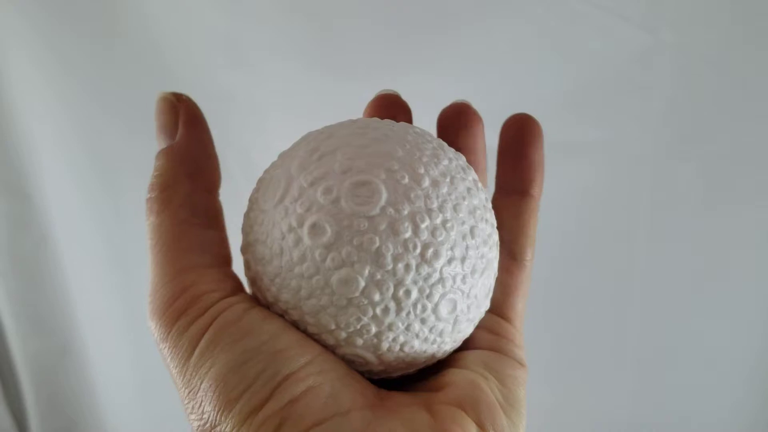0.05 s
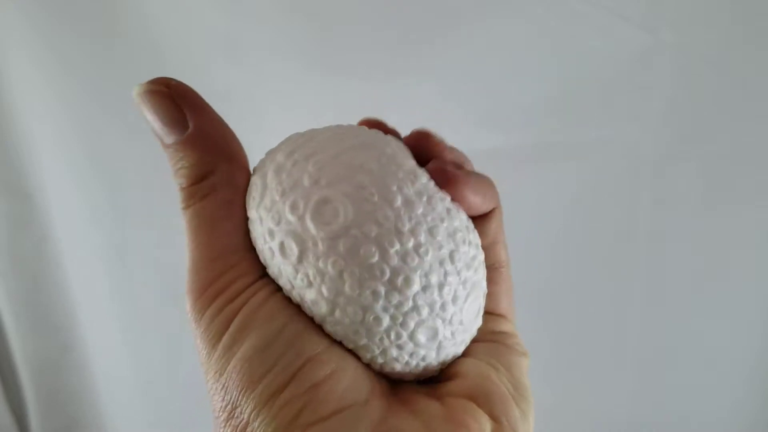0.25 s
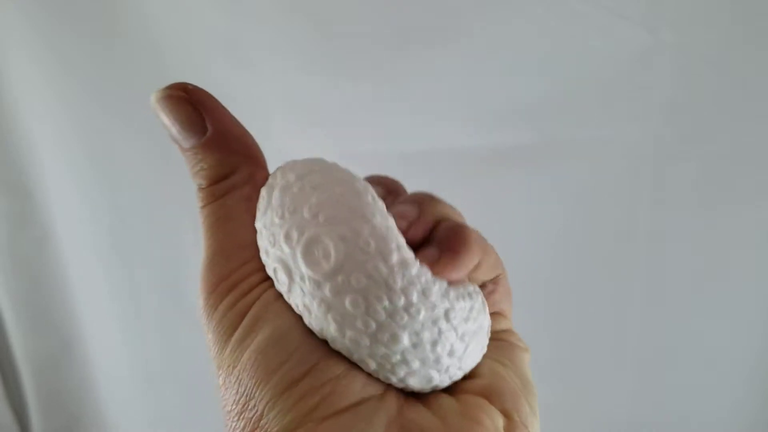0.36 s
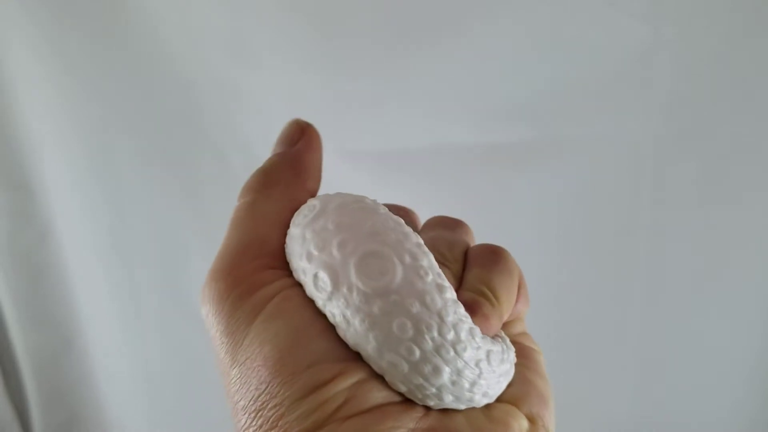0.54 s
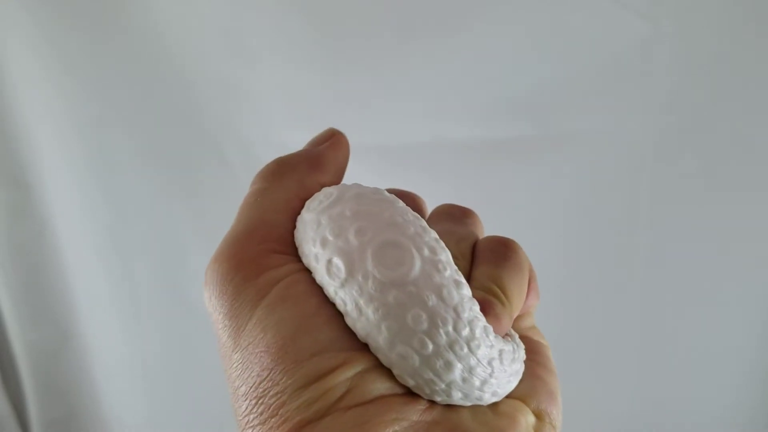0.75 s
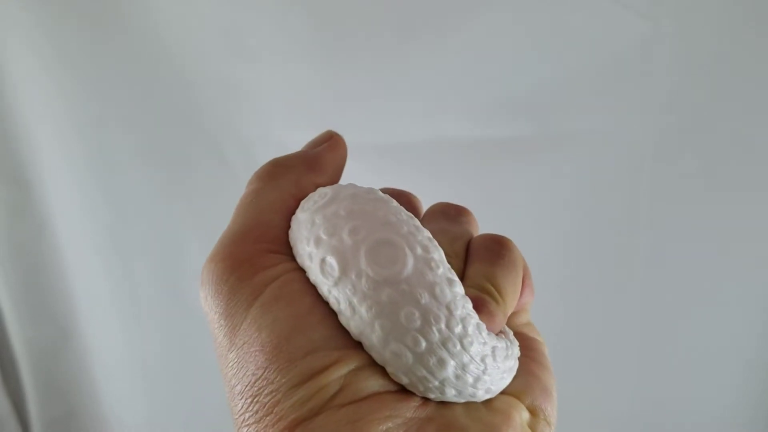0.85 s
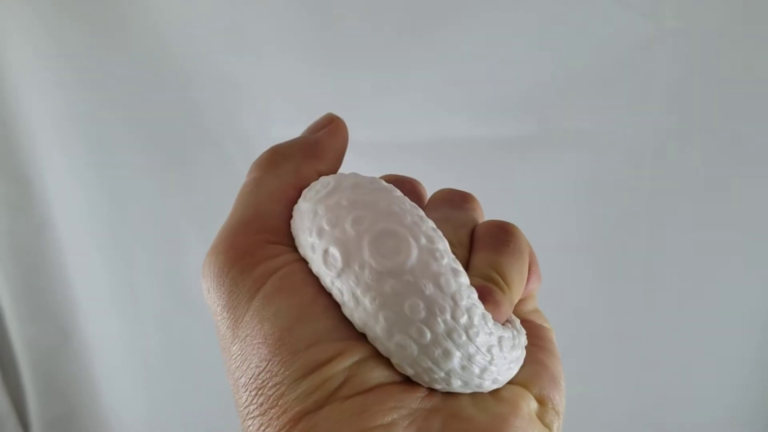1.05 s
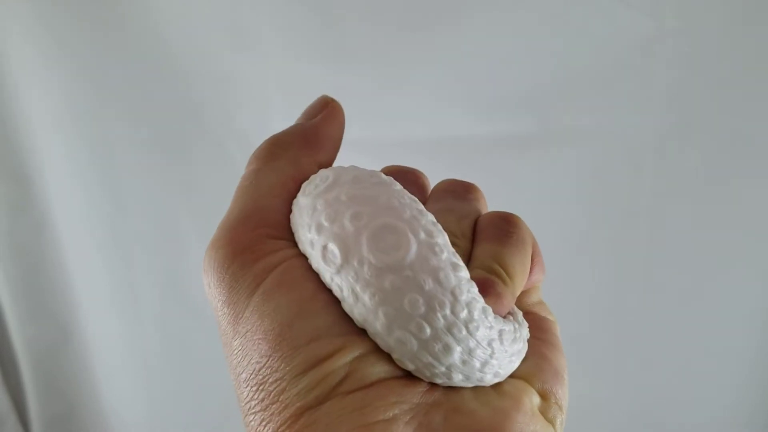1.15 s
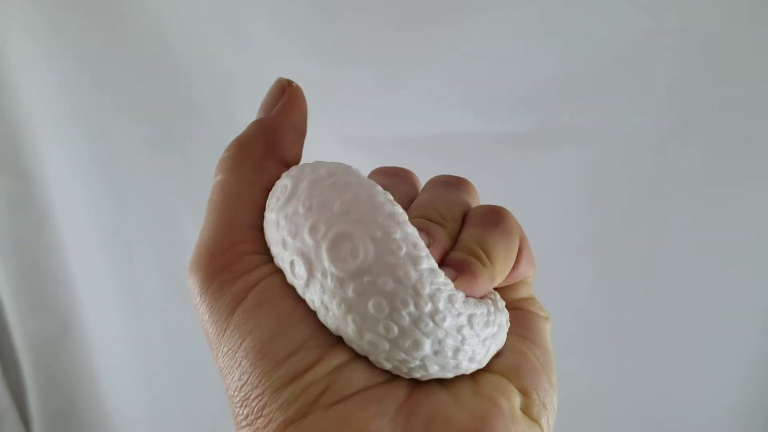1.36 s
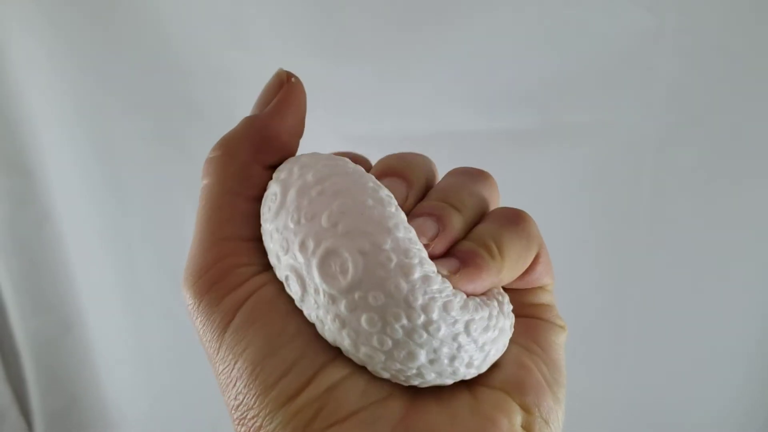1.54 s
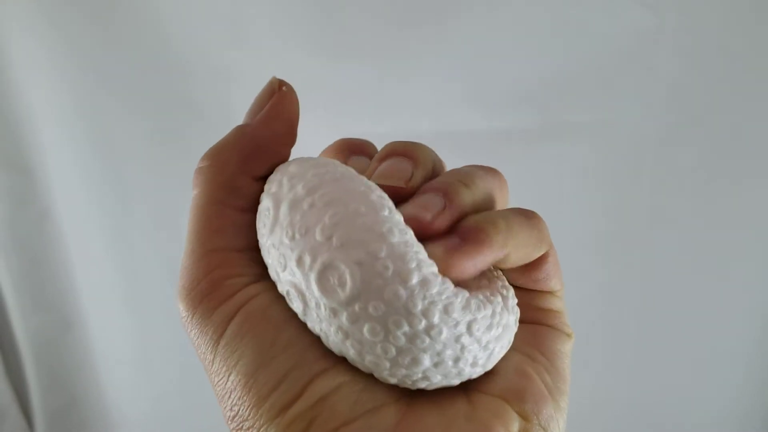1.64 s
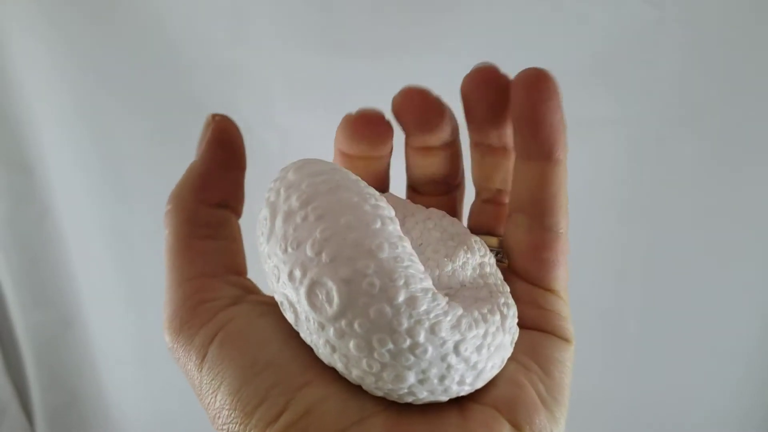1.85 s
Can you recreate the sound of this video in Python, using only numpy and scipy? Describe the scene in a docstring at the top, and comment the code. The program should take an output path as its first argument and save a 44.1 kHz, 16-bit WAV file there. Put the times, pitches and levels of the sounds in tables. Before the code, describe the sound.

Close stereo sound of skin sliding on a foam ball: one quick high hiss as it is squeezed, near stillness, then a weaker release rustle ending in a small peak, with deep soft room hum and bumps.

```python
"""A hand squeezes a soft foam ball close to the microphone, holds it and lets go.
Sliding skin is a fine, bright hiss: dense random grains mixed with smooth noise.
Fingers peel off with a fainter, duller rustle, and a thin band of hiss glides upwards.
Behind it a quiet room hums and bumps softly, and a deep wandering tone swells three times."""
import sys
import numpy as np
from scipy import signal
from scipy.fft import rfft, irfft, next_fast_len
from scipy.io import wavfile
from scipy.ndimage import uniform_filter1d, map_coordinates

SR = 44100
rng = np.random.default_rng(int(sys.argv[2]) if len(sys.argv) > 2 else 0)


def wav_record(signal):
    """Record a signal, one row per channel, as 16-bit PCM in the file named by sys.argv[1]."""
    frames = np.transpose(np.atleast_2d(signal))
    bounded = np.clip(frames, -1, 1)
    # unit amplitude maps onto the largest positive 16-bit level
    quanta = np.round(bounded * 32767).astype(np.int16)
    wavfile.write(sys.argv[1], SR, quanta)


N = 83790
START_S = .1055  # silence before this moment

# how strong the deep room rumble is over time: start_s, level_db
RUMBLE_LEVELS = [(.105, -49.5), (.15, -42), (.195, -39.5), (.235, -45.5), (.29, -45.5), (.32, -61),
                 (.38, -53.5), (.46, -58), (.56, -56.5), (.66, -71), (.7, -43), (.745, -45.5), (.79, -40.5),
                 (.9, -47.5), (1.0, -57), (1.08, -57.5), (1.13, -73), (1.17, -64.5), (1.24, -63),
                 (1.28, -53), (1.345, -48), (1.375, -66), (1.41, -49), (1.46, -63.5), (1.9, -80)]


def amp(db):
    """Turn decibels into a gain."""
    return 10 ** (np.asarray(db) / 20)


def unit(x):
    """Scale a sound to an average strength (rms) of 1."""
    return x / np.sqrt(np.mean(x ** 2) + 1e-20)


def along(points, hz):
    """Read a value at each frequency from (Hz, value) points on a log axis."""
    point_hz, value = np.transpose(points)
    return np.interp(np.log(hz + 1), np.log(point_hz + 1), value)


def curves(rows):
    """Give one value per sample for each column after the time."""
    s, *columns = np.transpose(rows)
    return [np.interp(np.arange(N) / SR, s, column) for column in columns]


def wobble(rate):
    """Draw a smooth random curve through `rate` random points a second."""
    points = rng.standard_normal(N // 8)
    return map_coordinates(points, [np.arange(N) * rate / SR + 2], mode="wrap")


def filtered(x, response):
    """Multiply the spectrum of x by a function of frequency."""
    m = next_fast_len(N + SR // 2)
    return irfft(rfft(x, m) * response(np.fft.rfftfreq(m, 1 / SR)), m)[..., :N]


def coloured(x, colour):
    """Shape the spectrum of x by a colour table, at rms 1."""
    return unit(filtered(x, lambda hz: amp(along(colour, hz))))


def noise(colour, side_db):
    """Make stereo noise of rms 1; a stronger side signal sounds wider."""
    mid, side = coloured(rng.standard_normal((2, N)), colour)
    return unit(np.array([mid + amp(side_db) * side, mid - amp(side_db) * side]))


def tone(hz, wander_hz, rate):
    """Make a low drone of rms 1 whose pitch wanders."""
    turns = np.cumsum(hz + wander_hz * wobble(rate)) / SR
    turns = turns - turns[int(START_S * SR)]  # begin at the lowest point of the wave
    return -np.sqrt(2) * np.cos(2 * np.pi * turns)


def swelling(s, half_s, db):
    """Make a bell-shaped rise and fall of level around a moment."""
    return amp(db) * np.exp(-.5 * ((np.arange(N) / SR - s) / half_s) ** 2)


def panned(x, right):
    """Balance left against right differently at each frequency, at rms 1."""
    halves = np.array([[-.5], [.5]])  # half the difference on each side
    return unit(filtered(x, lambda hz: amp(along(right, hz) * halves)))


def microphone_hiss():
    """Shape steady random noise into the hiss of the microphone."""
    # tone colour: pitch_hz, relative_db per Hz
    hiss_colour = [(300, 0.5), (1200, -2), (1900, 1), (2600, -1.5), (3400, 0), (4300, -6), (5800, -5),
                   (6600, 3.5), (7500, -10.5), (9300, -12.5), (11800, 1), (14200, 2), (15400, 2.5)]
    # right side over left: pitch_hz, difference_db
    hiss_right = [(400, -1), (1500, -2), (4000, -2.5), (8000, -6), (11000, -1), (15000, 3)]
    return amp(-79.5) * panned(noise(hiss_colour, side_db=0.5), hiss_right)


def air():
    """Shape random noise into the steady, mostly low sound of the room's air."""
    # tone colour: pitch_hz, relative_db per Hz
    air_colour = [(15, -9), (40, 0.5), (100, -1), (135, -11), (180, -7.5), (280, -13), (450, -29),
                  (800, -34), (1200, -37.5), (2500, -47)]
    return amp(-73) * noise(air_colour, side_db=-5)


def hum():
    """Add low tones of slightly wandering pitch that grow a little with the rumble."""
    # steady tones: pitch_hz, level_db (while the rumble is at its average dB)
    hum_tones = [(64.6, -62), (115, -68)]
    grows = 0.12  # dB per dB of rumble
    rumble_db, = curves(RUMBLE_LEVELS)
    growth_db = grows * (rumble_db - rumble_db.mean())
    return sum(amp(db + growth_db) * tone(hz, wander_hz=0.75, rate=16) for hz, db in hum_tones)


def rumble():
    """Swell a deep tone of wandering pitch, with low noise that rises along with it."""
    # colour of the noise around the tone: pitch_hz, relative_db per Hz
    swell_colour = [(15, -1.5), (30, -0.5), (55, 3.5), (90, 4), (115, 3.5), (145, -15.5), (250, -19.5),
                    (400, -29), (800, -51.5), (2000, -68)]
    full_swell_db, grows = -53.5, 0.61  # noise level at the loudest rumble; dB per dB of rumble
    level_db, = curves(RUMBLE_LEVELS)
    boom = amp(level_db) * tone(52.3, wander_hz=1.8, rate=39)
    swell_db = full_swell_db + grows * (level_db - level_db.max())
    return boom + amp(swell_db) * noise(swell_colour, side_db=-14.5)


def bumps():
    """Make muffled bumps, each a short swell of noise in a narrow low band."""
    # soft low bumps: middle_s, half_length_s, level_db, pitch_hz
    bump_rows = [(0.176, 0.016, -69.5, 272), (0.244, 0.016, -63.5, 193), (0.373, .015, -77.5, 175),
                 (0.586, 0.018, -76, 268), (1.235, .02, -61, 95), (1.35, 0.0079, -54, 88)]
    width = 0.18  # share of the pitch
    total = 0
    for s, half_s, db, pitch_hz in bump_rows:
        band = filtered(rng.standard_normal(N),
                        lambda hz: 1 / (1 + ((hz - pitch_hz) / (width * pitch_hz)) ** 2))
        total = total + swelling(s, half_s, db) * unit(band)
    return total


def room():
    """Add up the room's sounds, leaning slightly to the left."""
    return (rumble() + hum() + bumps() + air()) * amp([[.8], [-.8]])


def echo(x):
    """Answer with a small room's echo: a fading burst of random reflections."""
    fade_s = 0.2  # time to fall by 60 dB
    t = np.arange(SR // 3) / SR
    tail = rng.standard_normal((2, len(t))) * amp(-60 * t / fade_s) * (t > .004)
    return signal.fftconvolve(x, tail / np.linalg.norm(tail[0]), axes=1)[:, :N]


def nearby(x):
    """Add early reflections from the palm and things close by, different on each side."""
    fade_s, level_db = 0.046, -4  # time to fall by 60 dB; strength beside the direct sound
    t = np.arange(SR // 25) / SR
    taps = rng.standard_normal((2, len(t))) * amp(-60 * t / fade_s)
    taps = taps * (t > .0003)  # none before the palm answers
    taps = taps / np.linalg.norm(taps, axis=1, keepdims=True)
    return x + amp(level_db) * signal.fftconvolve(x, taps, axes=1)[:, :N]


def slips(colour, flutter_db):
    """Mix dense grains, as skin sticks and slips, with smooth rubbing noise."""
    slips_per_s, smooth_share = 2800, .35  # share of the power that is smooth noise
    hit = (rng.random(N) < slips_per_s / SR).astype(float)
    grain_level = np.sqrt(np.abs(uniform_filter1d(hit, size=6)))  # each grain lasts 6 samples
    grains = unit(grain_level * rng.standard_normal((2, N)))
    smooth = rng.standard_normal((2, N))
    rub = np.sqrt(1 - smooth_share) * grains + np.sqrt(smooth_share) * smooth
    return unit(coloured(rub, colour) * amp(flutter_db * wobble(220)))


def whistle():
    """Glide a faint narrow band of hiss upwards, like a sibilance as the grip relaxes."""
    # path of the band: start_s, pitch_hz, level_db (before the left-right balance)
    glide = [(1.22, 11090, -102), (1.275, 11800, -85.5), (1.315, 13740, -95), (1.35, 14330, -85),
             (1.4, 14750, -102)]
    width_hz = 400
    hz, level_db = curves(glide)
    low_noise = filtered(rng.standard_normal((2, N)), lambda f: 1 / (1 + (f / width_hz) ** 2))
    carrier = np.sin(2 * np.pi * np.cumsum(hz) / SR)  # lifts the low noise to the gliding pitch
    return unit(low_noise * carrier) * amp(level_db) * amp([[-2], [2]])


def skin():
    """Swell short, duller rustles as skin comes unstuck or the grip shifts."""
    # patches of skin unsticking: middle_s, half_length_s, level_db (before the balance)
    peels = [(1.545, 0.032, -85), (1.61, 0.019, -90), (1.655, 0.015, -85), (1.682, .015, -78)]
    # small shifts of the grip: middle_s, half_length_s, level_db (before the balance)
    shifts = [(0.684, 0.0043, -83), (1.057, 0.007, -105), (1.284, 0.014, -101)]
    # tone colour: pitch_hz, relative_db per Hz
    rustle_colour = [(200, -18), (600, -5), (850, 2), (1150, -5), (1500, -2), (2100, -2.5), (2700, -7.5),
                     (3400, -7), (5000, -8), (8000, -12), (15000, -20)]
    level = sum(swelling(*touch) for touch in [*peels, *shifts])
    return level * slips(rustle_colour, flutter_db=2) * amp([[2], [-2]])


def slide(stroke, colour, right):
    """Slide skin over foam: slips with close reflections follow the friction level."""
    level_db, = curves(stroke)
    return panned(nearby(slips(colour, flutter_db=1.0)), right) * amp(level_db)


def release():
    """Ease the fingers out and peel them off with a second rush of slips."""
    # friction: start_s, level_db
    stroke = [(1.22, -100), (1.33, -78.5), (1.49, -74), (1.54, -65.5), (1.57, -67.5), (1.6, -64.5),
              (1.635, -66.5), (1.668, -59.5), (1.685, -53.5), (1.702, -63), (1.74, -74.5), (1.9, -80.5)]
    # tone colour: pitch_hz, relative_db per Hz
    colour = [(300, -34), (2000, -40), (5400, -27), (6400, -9.5), (7700, -19.5), (8400, -26),
              (10000, -16.5), (11700, -6.5), (13000, -2), (14000, -2.5), (14800, -0.5), (15400, 0.5)]
    # right side over left: pitch_hz, difference_db
    right = [(2000, 6), (6500, -10), (9000, 0.5), (12000, 5), (15000, 4)]
    return slide(stroke, colour, right)


def squeeze():
    """Slide the fingers inwards with a quick, bright rush of slips."""
    # friction: start_s, level_db
    stroke = [(.322, -92), (.34, -66.5), (.36, -48.5), (.372, -53), (.384, -50), (.399, -52.5),
              (.418, -55.5), (.454, -57), (.462, -53), (.472, -57.5), (.497, -58.5), (.518, -68.5),
              (.545, -73.5), (.59, -84), (.66, -100)]
    # tone colour: pitch_hz, relative_db per Hz
    colour = [(300, -46), (1500, -29.5), (4000, -28), (5200, -19.5), (6200, -12), (7500, -9.5),
              (8500, -17.5), (11000, -4.5), (12000, -3.5), (13000, 1.5), (14300, 0.5), (15400, -3)]
    # right side over left: pitch_hz, difference_db
    right = [(2000, -5.5), (6500, -1), (9000, 1), (12000, 5.5), (15000, 3.5)]
    return slide(stroke, colour, right)


def scene():
    """Put the hand and the ball, with their echo, in front of the room."""
    hand = squeeze() + release() + skin() + whistle()
    return hand + amp(-14) * echo(hand) + room()


def record(dry):
    """Add microphone hiss, open after a moment of silence and cut steeply above the top pitch."""
    top_hz = 15740
    live = (dry + microphone_hiss()) * (np.arange(N) / SR >= START_S)
    return signal.sosfilt(signal.ellip(14, .1, 80, top_hz, fs=SR, output="sos"), live)


dry = scene()
out = record(dry)
wav_record(out)
```